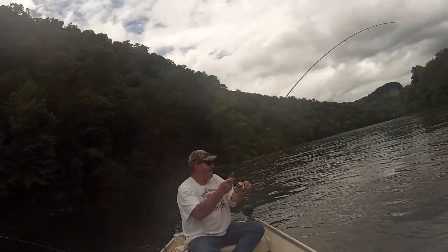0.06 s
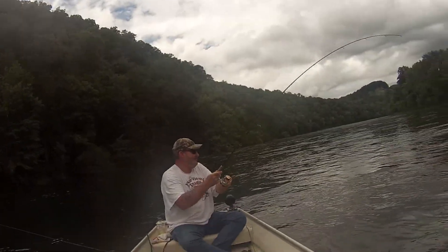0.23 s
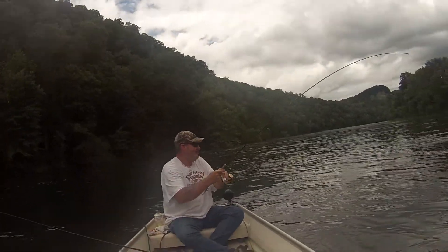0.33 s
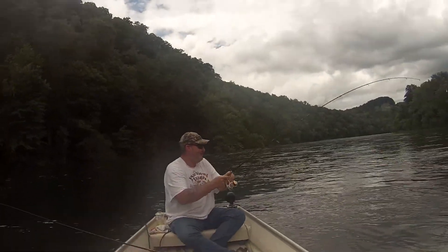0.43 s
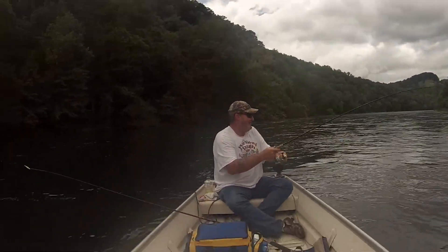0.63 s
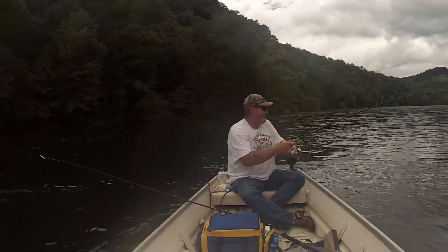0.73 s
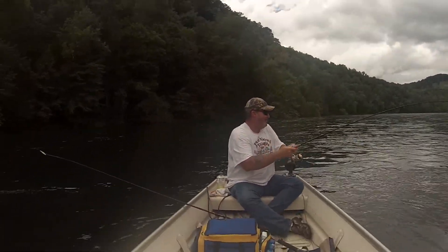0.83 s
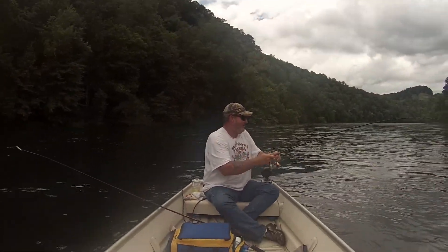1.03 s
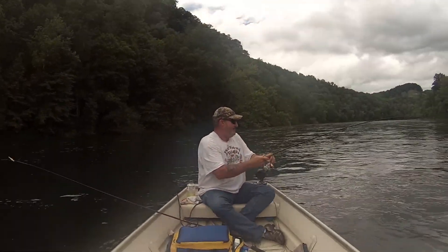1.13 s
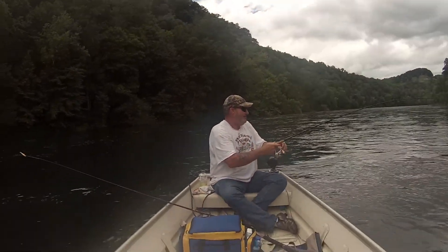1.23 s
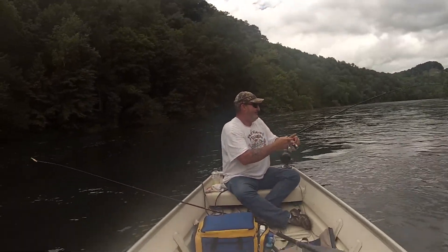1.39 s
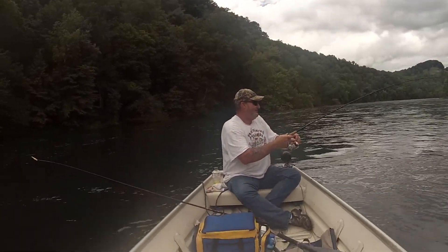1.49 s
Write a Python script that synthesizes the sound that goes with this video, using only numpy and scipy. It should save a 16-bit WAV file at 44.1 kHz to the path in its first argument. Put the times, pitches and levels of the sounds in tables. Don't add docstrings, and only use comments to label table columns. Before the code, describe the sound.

One sharp hollow knock close by, later a brief rattling scrape over low water rumble

```python
import sys
import numpy as np
from scipy import signal
from scipy.fft import rfft, irfft
from scipy.io import wavfile
from scipy.ndimage import uniform_filter1d, minimum_filter1d

SR = 44100
rng = np.random.default_rng(int(sys.argv[2]) if len(sys.argv) > 2 else 0)


def level_to_linear(level):
    exponent = np.asarray(level, float) / 20
    return 10 ** exponent


def pcm_store(signal):
    levels = np.round(np.clip(np.atleast_2d(signal), -1, 1) * 32767)
    wavfile.write(sys.argv[1], SR, levels.astype(np.int16).T)


N = 68355


def evened(x):
    return x / np.sqrt(np.mean(x ** 2) + 1e-20)


def coloured(spectrum, count):
    f, db = np.transpose(spectrum)
    hz = np.fft.rfftfreq(count, 1 / SR)
    gain = level_to_linear(np.interp(np.log(hz + 1), np.log(f + 1), db, left=-70, right=-70))
    return evened(irfft(rfft(rng.standard_normal(count)) * gain, count))


def curve(points):
    return np.interp(np.arange(N) / SR, *np.transpose(points))


def add(mix, start, sound):
    part = mix[max(round(start * SR), 0):][:len(sound)]
    part += sound[:len(part)]


def rounded(x, hz):
    return signal.sosfilt(signal.butter(3, hz, fs=SR, output="sos"), x)


def ring(force, bands):
    response = 0
    pulse = np.eye(1, 4096)[0]
    for k, (hz, width, db) in enumerate(bands):
        r = np.exp(-np.pi * width / SR)
        poles = [1, -2 * r * np.cos(2 * np.pi * hz / SR), r * r]
        sign = (-1) ** k
        response = response + sign * level_to_linear(db) * (1 - r) * signal.lfilter([1, 0, -1], poles, pulse)
    return signal.oaconvolve(force, response / np.linalg.norm(response))[:N]


# (frequency [Hz], level [dB])
RUMBLE_SPECTRUM = [(5, -1), (12, -6), (25, 2.5), (45, -9.5), (70, -22.5), (120, -29.5), (300, -64)]
# (time [s], level [dB])
RUMBLE_SWELL = [(0, -43), (.13, -42), (.19, -48.5), (.4, -39), (.6, -44.5), (.7, -37), (.85, -44),
                (1.09, -44.5), (1.2, -42), (1.33, -37), (1.45, -42.5), (1.55, -47)]
# (frequency [Hz], level [dB])
HISS_SPECTRUM = [(50, -19), (90, -4), (170, -1), (300, -15), (700, -19.5), (3000, -27), (12000, -45.5),
                 (15500, -68)]
HISS_DB = -54


def river():
    rumble = level_to_linear(curve(RUMBLE_SWELL)) * coloured(RUMBLE_SPECTRUM, N)
    hiss = level_to_linear(HISS_DB) * coloured(HISS_SPECTRUM, N)
    return rumble + hiss


# (frequency [Hz], width [Hz], level [dB])
HOUSING = [(266.5, 48, -6.5), (917, 68, -10.5), (1162, 56.5, 0), (1421, 168, -1), (1985, 77, -3.5),
           (2253, 97, -4.5), (3050, 67, -11.5)]
# (time [s], level [dB])
RUB = [(0.0, -64.5), (1.004, -60.5), (1.276, -61.5), (1.55, -66)]
# (middle [s], half length [s], extra lower level [dB], extra upper level [dB])
STROKES = [
    (0.576, 0.049, 8, 4.5),
    (.8, .1, 3, 4.5),
    (1.0, 0.15, 1.5, 3),
    (1.45, 0.14, 6.5, 8),
]
RUB_UPPER_DB, RUB_DULL_HZ = -5, 5100


def rubbing():
    t = np.arange(N) / SR
    levels_db = curve(RUB)
    for middle, half, *extra_db in STROKES:
        levels_db = levels_db + np.outer(extra_db, np.exp(-((t - middle) / half) ** 2))
    lumps = evened(uniform_filter1d(uniform_filter1d(rng.standard_normal(N), 500), 500))
    low, high = level_to_linear(levels_db + 2.3 * lumps) * rng.standard_normal(N)
    lower = ring(low, HOUSING[:4])
    upper = ring(rounded(high, RUB_DULL_HZ), HOUSING[4:])
    return lower + level_to_linear(RUB_UPPER_DB) * upper


# (frequency [Hz], width [Hz], level [dB])
BRIGHT = [(3400, 300, -17), (4000, 400, 9), (5550, 600, 1.5), (7160, 1900, -8)]
# (start [s], length [s], lower housing level [dB], upper housing level [dB], bright level [dB])
SCRAPES = [(0, 0.016, -53.5, -58, -63.5), (0.186, 0.0048, -37, -42, -68), (0.191, .011, -44, -46, -67),
           (0.204, 0.0081, -36, -44.5, -68), (0.21, 0.011, -22, -35, -54), (0.217, .004, -37, -54, -56),
           (.229, 0.01, -56, -42, -58), (0.269, .005, -53, -58, -72), (0.2759, 0.011, -41.5, -46.5, -77),
           (0.802, .003, -59, -62, -65), (1.047, 0.013, -54, -61, -60.5), (1.184, 0.0064, -60, -58, -67),
           (1.282, 0.039, -53, -55.5, -66), (1.314, 0.011, -35, -39, -47), (1.325, 0.013, -45, -46, -59),
           (1.342, 0.012, -38, -44, -62), (1.35, 0.016, -40, -38.5, -51.5), (1.362, .013, -40.5, -47, -55),
           (1.374, 0.012, -43, -48, -56.5), (1.384, 0.015, -38.5, -46, -59),
           (1.397, 0.039, -48.5, -53.5, -69), (1.504, 0.012, -51.5, -54, -57.5),
           (1.516, 0.014, -55.5, -60, -74)]
GRAINS_PER_S, GRAIN_DB = 3000, 2.5
SCRAPE_PEAK = .3
DULL_HZ, SHARP_HZ = 2960, 7440


def scrapes():
    sizes = level_to_linear(GRAIN_DB * np.minimum(rng.exponential(1, N), 4))
    slips = sizes * (rng.random(N) < GRAINS_PER_S / SR) * rng.choice([-1., 1.], N)
    friction = evened(slips) + 0.74 * rng.standard_normal(N)
    drive = np.zeros((3, N))
    for start, length, *levels_db in SCRAPES:
        u = np.arange(0, length, 1 / SR) / length
        burst = evened(friction[max(round(start * SR), 0):][:len(u)])
        burst = burst * np.minimum(u / SCRAPE_PEAK, 1) * np.cos(np.pi / 2 * u) ** .7
        for row, db in zip(drive, levels_db):
            add(row, start, level_to_linear(db) * burst)
    low, high = rounded(drive[:2], DULL_HZ)
    sharp = rounded(drive[2], SHARP_HZ)
    return ring(low, HOUSING[:4]) + ring(high, HOUSING[4:]) + ring(sharp, BRIGHT)


# (frequency [Hz], level [dB], 60 dB decay time [s])
MOUNT_MODES = [(267, -21, .1), (1440, -4, .04), (2075, -8.5, .035),
               (165, -18.5, 0.023), (560, -44, 0.034), (803, -19.5, 0.034), (1290, -10, 0.041),
               (1920, -18.5, 0.02), (2380, -56, .03), (3100, -30.5, .05), (3583, -28.5, 0.055),
               (4032, -28.5, 0.019)]
# (frequency [Hz], level [dB])
CRACK_SPECTRUM = [(2200, -49), (3000, -9), (4000, 2.5), (6000, 0), (9000, -10), (10000, -22),
                  (14000, -23.5), (16300, -50)]
KNOCK_S, KNOCK_RISE_S = .22413, .0009
CRACK_DB, CRACK_T60_S = -27, .009
PUSH_DB, PUSH_S = -36, 0.003
SWAY_HZ, SWAY_DB, SWAY_RISE_S, SWAY_FADE_S = 36.8, -22, 0.0027, 0.064
GRIP_S, GRIP_DB, GRIP_HZ = .0017, -17, 1000


def knock():
    t = np.arange(SR // 2) / SR - KNOCK_RISE_S
    after = np.maximum(t, 0)
    choke_db = GRIP_DB * np.clip((t / GRIP_S - 1) / 1.5, 0, 1)
    body = 0
    for hz, db, t60 in MOUNT_MODES:
        choked = hz > GRIP_HZ
        level = level_to_linear(db - 60 * after / t60 + choke_db * choked)
        body = body - level * np.cos(2 * np.pi * (hz * t - choked / 4))
    crack = level_to_linear(CRACK_DB - 60 * after / CRACK_T60_S) * coloured(CRACK_SPECTRUM, len(t))
    push = -level_to_linear(PUSH_DB) * np.cos(np.pi / 2 * np.minimum(abs(t) / PUSH_S, 1)) ** 2
    rise = np.sin(np.pi / 2 * np.minimum((t / KNOCK_RISE_S + 1) / .6, 1)) ** 2
    sway_level = level_to_linear(SWAY_DB - 10 * (after / SWAY_FADE_S) ** 2) * np.minimum(after / SWAY_RISE_S, 1)
    sway = sway_level * np.sin(2 * np.pi * SWAY_HZ * after)
    out = np.zeros(N)
    add(out, KNOCK_S - KNOCK_RISE_S, rise * (body + crack + push) + sway)
    return out


# (start [s], length [s], first frequency [Hz], last frequency [Hz], level [dB], waver [Hz])
WHISTLES = [
    (0.553, .08, 4230, 4500, -72, 120),
    (0.725, 0.21, 2290, 2417, -68, 60.4),
    (0.927, .22, 2313, 2422, -63.5, 24.5),
]


def whistles():
    out = np.zeros(N)
    for start, length, from_hz, to_hz, db, waver_hz in WHISTLES:
        u = np.arange(0, length, 1 / SR) / length
        waver = evened(uniform_filter1d(rng.standard_normal((2, N)), 250))[:, :len(u)]
        hz = from_hz + (to_hz - from_hz) * u + waver_hz * waver[0]
        level = level_to_linear(db + 2.5 + 3.7 * waver[1]) * np.sin(np.pi * u) ** .5
        add(out, start, level * np.sin(2 * np.pi * np.cumsum(hz) / SR))
    return out


def scene():
    return (river() + rubbing() + scrapes() + knock() + whistles())[None]


def top_cut(x):
    return signal.sosfilt(signal.butter(12, 15000, fs=SR, output="sos"), x)


LIMIT, LIMIT_S = .99, .0005


def record(dry):
    span = round(LIMIT_S * SR)
    room = minimum_filter1d(np.minimum(LIMIT / (abs(dry) + 1e-9), 1), 2 * span + 1)
    held = dry * uniform_filter1d(uniform_filter1d(room, span), span)
    return top_cut(held)


dry = scene()
out = record(dry)
pcm_store(out)
```